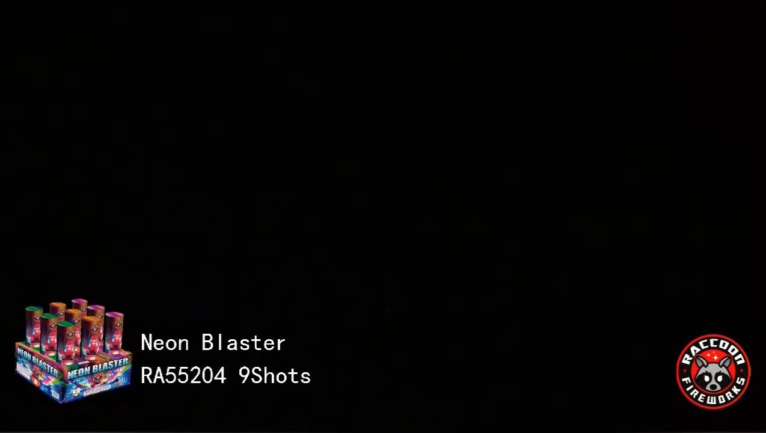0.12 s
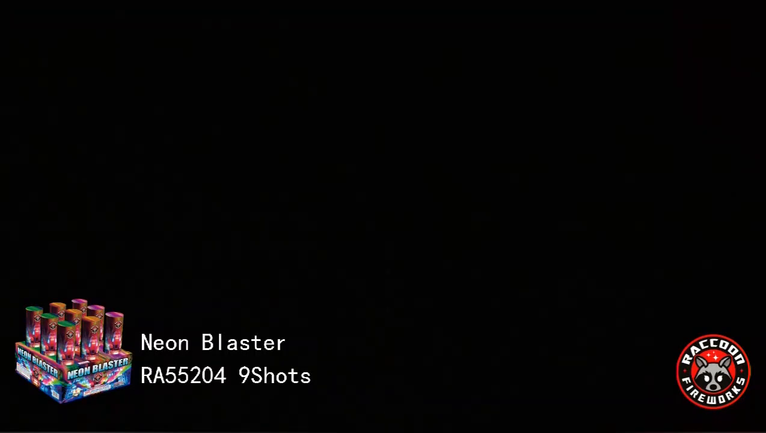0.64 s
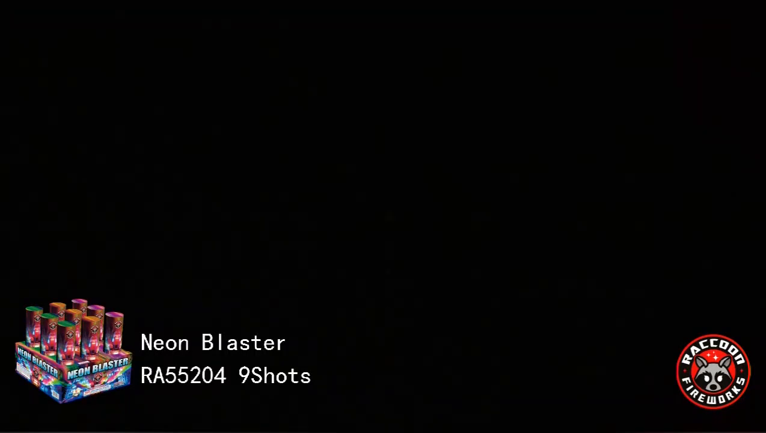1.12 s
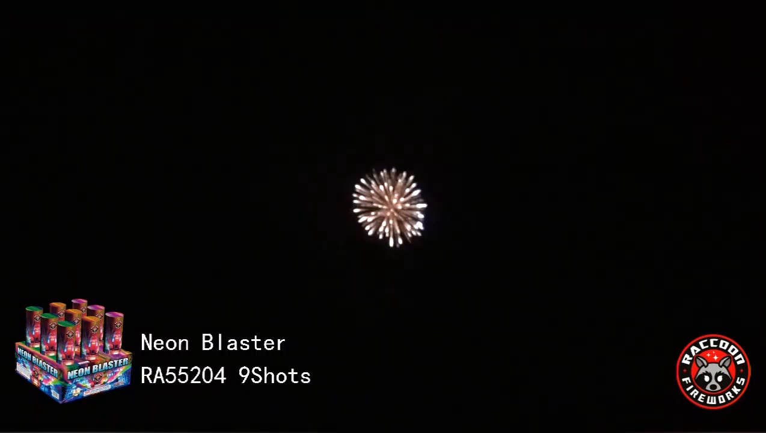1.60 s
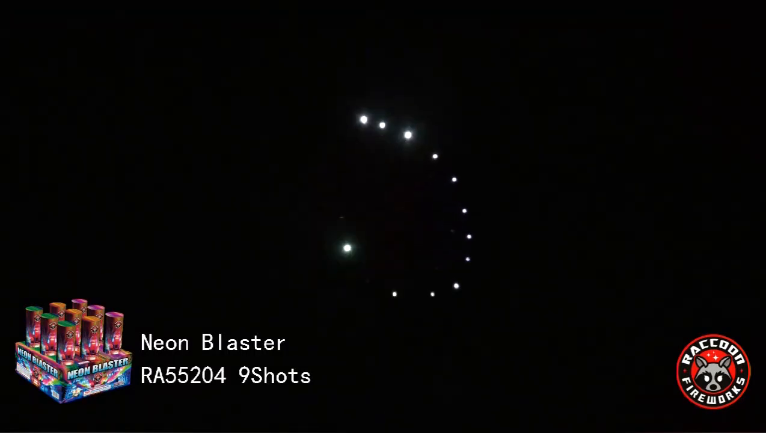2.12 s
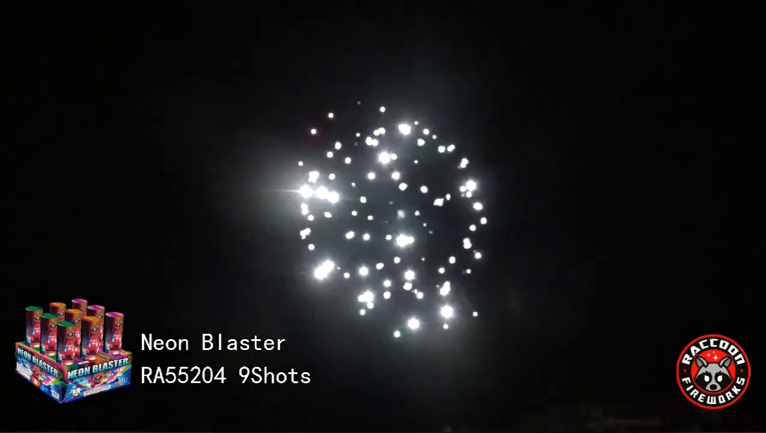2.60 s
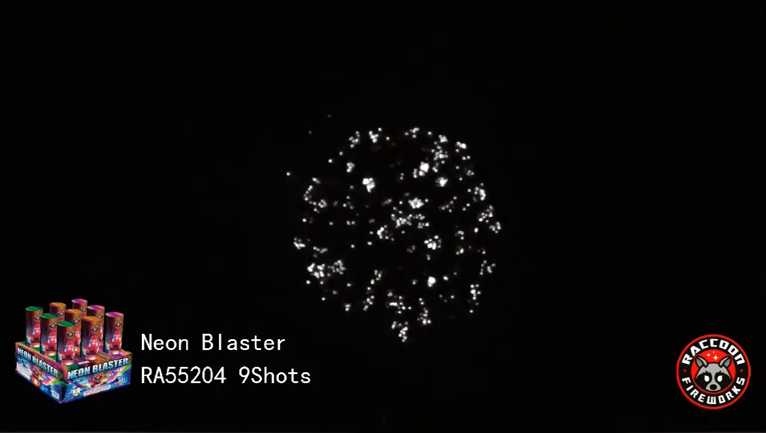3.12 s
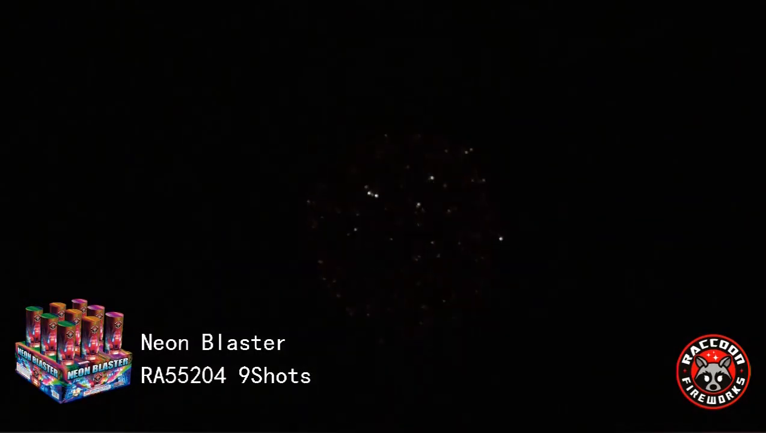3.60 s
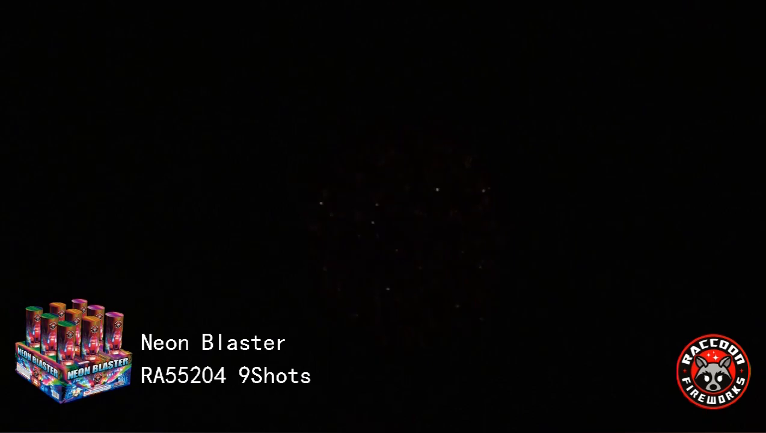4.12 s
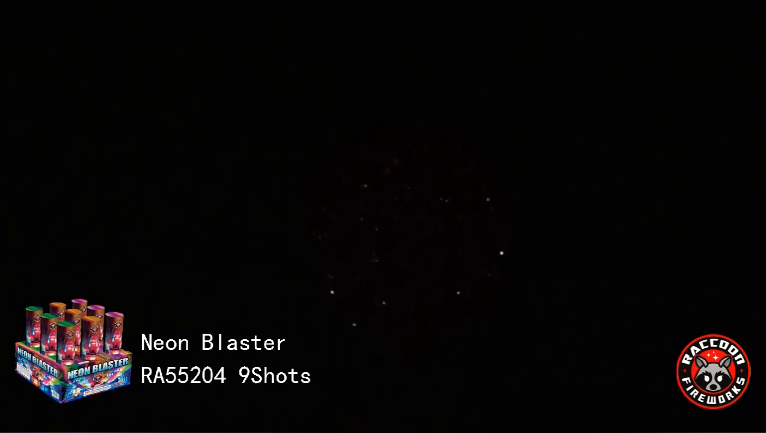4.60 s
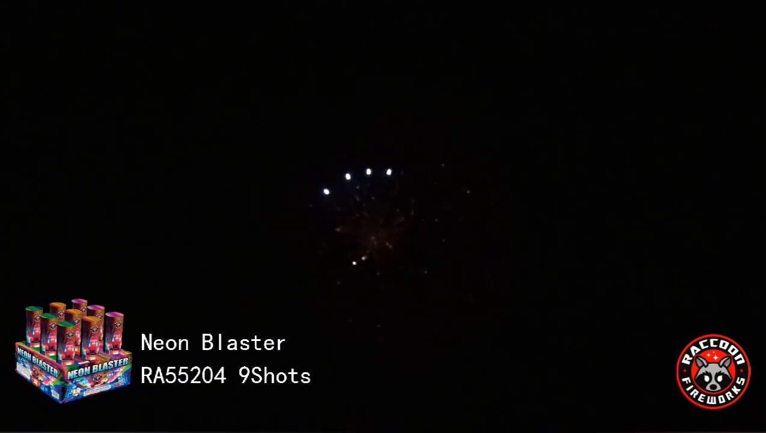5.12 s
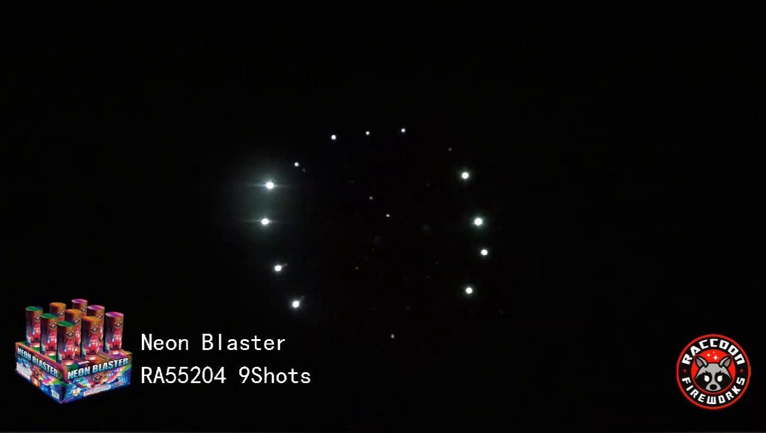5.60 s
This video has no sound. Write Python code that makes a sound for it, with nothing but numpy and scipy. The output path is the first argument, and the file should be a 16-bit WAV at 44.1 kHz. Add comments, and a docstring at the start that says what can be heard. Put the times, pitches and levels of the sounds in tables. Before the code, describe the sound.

Outdoor night fireworks heard from about a hundred metres. A fading launch echo opens over high insect buzz and faint rumble. A shell bursts with a cracking boom that rolls back from trees and slopes, then a dense crackle of stars erupts, a launch thumps within it, and a second shell booms near the end. Stereo microphones, with loud peaks slightly rounded.

```python
"""Firework shells at night, a hundred metres off, with insects buzzing and a far rumble all through.
It opens on the tail of a launch just before the start; a first shell bursts near 1.9 s.
A cloud of stars crackles from about 2.9 s, a second launch thumps at 3.2 s, and a second shell bursts near 5.3 s.
The fronts and stars are short pressure pulses; the blasts roll back from trees and slopes as dense noise
echoes, whose colour changes with delay; the insects are coloured noise, the buzzers pulsed by wing strokes."""
import sys
import numpy as np
from scipy import signal
from scipy.fft import rfft, irfft, next_fast_len
from scipy.io import wavfile
from scipy.ndimage import uniform_filter1d, map_coordinates

SR = 44100
rng = np.random.default_rng(int(sys.argv[2]) if len(sys.argv) > 2 else 0)


def gain_from_db(level_db):
    """Convert decibel levels to linear amplitude factors (20 dB per decade)."""
    decades = np.asarray(level_db, float) / 20
    return 10 ** decades


def generate_wav(signal):
    """Clip the signal to [-1, 1] and save it as 16-bit WAV at the path in sys.argv[1]."""
    frames = np.transpose(np.atleast_2d(signal))
    scaled = np.clip(frames, -1, 1) * 32767
    pcm = np.round(scaled).astype(np.int16)
    wavfile.write(sys.argv[1], SR, pcm)


N = 252252
T = np.arange(N) / SR  # time of every sample [s]


def unit(x):
    """Scaled to rms 1."""
    return x / np.sqrt(np.mean(x ** 2) + 1e-20)


def along(points, hz):
    """Reads (frequency, value) points on a log frequency axis."""
    f, v = np.transpose(points)
    return np.interp(np.log(hz + 1), np.log(f + 1), v)


def curves(rows):
    """One value per sample for each column after the time."""
    s, *cols = np.transpose(rows)
    return [np.interp(T, s, c) for c in cols]


def wobble(rate):
    """A smooth random curve, rate knots a second."""
    return map_coordinates(rng.standard_normal(int(N * rate / SR) + 4), [T * rate])


def coloured(pair, spectrum, alike):
    """Two unrelated signals made into a stereo pair of rms 1 with this spectrum and left-right likeness."""
    m = next_fast_len(N + 8192)
    hz = np.fft.rfftfreq(m, 1 / SR)
    turn = np.arccos(np.clip(along(alike, hz), -1, 1)) / 2
    shaped = rfft(pair, m) * gain_from_db(along(spectrum, hz))
    mid, side = irfft(shaped * [np.cos(turn), np.sin(turn)], m)[:, :N]
    return unit(np.array([mid + side, mid - side]))


# copies of a pulse off the ground: (delay [ms], level [dB])
GROUND_COPIES = [(1.4, -8.5), (4, -9.5)]


def pops(s, db, hz, pan_db, damping, scatter, air_hz):
    """Pressure pulses, suck then push, with ground copies and a few ms of scattered sound; the air dulls them."""
    t = np.arange(SR // 50) / SR
    cycles = t * hz[:, None]
    wave = -np.exp(damping / 4) * 4 * cycles * np.exp(-damping * cycles) * np.sin(2 * np.pi * cycles)
    wave = wave + sum(gain_from_db(g) * np.roll(wave, round(d * SR / 1000), axis=1) for d, g in GROUND_COPIES)
    # scattered sound falls 60 dB in 19 ms
    wave = wave + scatter * rng.standard_normal((2, *wave.shape)) * gain_from_db(-60 * t / 0.019)
    at = (np.round(s * SR).astype(int)[:, None] + np.arange(len(t))).ravel()
    sides = gain_from_db(db + np.outer([.5, -.5], pan_db))[..., None] * wave
    air = signal.butter(3, air_hz, fs=SR, output="sos")
    return signal.sosfilt(air, [np.bincount(at, w.ravel(), N + SR)[:N] for w in sides])


# insects: (time [s], buzzer level [dB], lower chorus level [dB])
INSECT_LEVELS = [(0, -59.5, -68.5), (.7, -55.5, -70), (1.85, -56, -69), (2.5, -58, -66), (3.7, -58, -65),
                 (4.3, -57, -75), (5.2, -54.5, -72), (5.72, -57.5, -72)]
# colours of buzzers, chorus and far rumble: (frequency [Hz], relative density [dB per Hz])
BUZZ_COLOUR = [(3240, -47), (5500, -23), (6520, -24), (7290, -15), (8260, -9), (9490, -3.5), (10800, -4),
               (12000, -11), (12800, -17), (13600, -17), (15100, -25), (16000, -13)]
CHORUS_COLOUR = [(2600, -38), (3300, -8), (3550, -4), (3720, 4.5), (3900, -5.5), (4290, -3), (4650, 0),
                 (4890, -4.5), (5600, -17), (7280, -55)]
RUMBLE_COLOUR = [(15, -35), (30, 1.5), (60, 0.5), (120, -2.5), (237, -12.5), (371, -9), (500, -15),
                 (700, -16.5), (1140, -15.5), (2000, -21.5), (3300, -30), (4290, -35), (7260, -57)]
# width of the far rumble: (frequency [Hz], left-right likeness [0-1])
RUMBLE_ALIKE = [(60, 1), (300, 0.93), (2000, 1)]


def night():
    """Buzzers rasp their wings about 168 times a second; a lower chorus and far rumble lie beneath."""
    buzz_db, chorus_db = curves(INSECT_LEVELS)
    turn = 2 * np.pi * np.cumsum(168.5 + 1.5 * wobble(3)) / SR
    strokes = 1 + (.33 + .1 * wobble(4)) * np.cos(turn) + .15 * np.cos(2 * turn)
    noise = rng.standard_normal((3, 2, N))
    # the left channel has slightly more buzz and rumble
    buzz_gain = gain_from_db(buzz_db + 0.2 * wobble(9.4) + [[.4], [-.4]])
    buzz = buzz_gain * coloured(noise[0] * strokes, BUZZ_COLOUR, [(8000, 0.082), (13000, 0.82)])
    chorus_gain = gain_from_db(chorus_db + 2.3 * wobble(55))
    chorus = chorus_gain * coloured(noise[1], CHORUS_COLOUR, [(3000, 1.0), (5000, 0.87)])
    rumble_gain = gain_from_db(-63.5 + 1.5 * wobble(3.8) + [[.7], [-.7]])
    return buzz + chorus + rumble_gain * coloured(noise[2], RUMBLE_COLOUR, RUMBLE_ALIKE)


# loudest crackling stars and ticks: (time [s], level [dB], pitch [Hz], pan, left over right [dB])
LOUD_STARS = [(.533, -37, 2400, -3), (2.9199, -26, 2400, -1), (2.97, -20.5, 2900, 1),
              (3.041, -23, 2500, -.5), (3.059, -28, 1480, -15.5), (3.092, -19.5, 1900, 9),
              (3.1, -19.5, 2500, 12), (3.131, -15.5, 3000, 1), (3.1537, -19, 2520, 4),
              (3.1774, -9, 2170, -1), (3.1805, -13, 2710, -4), (3.1814, -8.5, 3500, -2),
              (3.2075, -16, 2400, -2), (3.2132, -13, 4200, -2), (3.2227, -8.5, 2140, 4),
              (3.2258, -9.5, 1980, 1), (3.2288, -16, 4500, -6), (3.259, -23, 4000, 5),
              (3.298, -25, 3000, -8), (3.333, -19.5, 2500, -10), (3.374, -20.5, 2520, -4),
              (3.4206, -20.5, 2800, -2), (3.4487, -14.5, 5530, 0), (3.5122, -20.5, 2310, -4),
              (3.6143, -22.5, 2080, -.5), (5.655, -27, 1700, -9), (5.705, -30, 1700, -13)]
# the rest of the crackle: (time [s], rate [pops a second], level of the smallest pops [dB])
STAR_CLOUD = [(2.85, 20, -45), (3.05, 150, -38), (3.2, 350, -35), (3.35, 200, -36), (3.55, 50, -44),
              (3.75, 10, -48)]


def crackle(count=600):
    """Small stars snap: a few loud ones over a random cloud, thinned from count candidates."""
    s, db, hz, pan_db = np.transpose(LOUD_STARS)
    times, rate, size_db = np.transpose(STAR_CLOUD)
    span = times[-1] - times[0]
    draw = rng.random((count, 5))
    when = times[0] + span * draw[:, 0]
    fires = draw[:, 1] * count / span < np.interp(when, times, rate)
    draw, when = draw[fires], when[fires]
    size = np.interp(when, times, size_db) + 12 * draw[:, 2] ** 2  # mostly small, some up to 12 dB louder
    pitch, cloud_pan_db = 1200 + 2200 * draw[:, 3], 5 * (draw[:, 4] - .5)
    loud = pops(s, db, hz, pan_db, damping=3.8, scatter=0.13, air_hz=6800)
    return loud + pops(when, size, pitch, cloud_pan_db, damping=6.9, scatter=0.26, air_hz=4500)


def patchy(pair, depth_db):
    """Echo paths interfere: narrow bands swell and fade at random."""
    z = signal.stft(pair, nperseg=1024)[2]
    field = uniform_filter1d(rng.standard_normal(z.shape[1:]), size=3, axis=0)
    field = uniform_filter1d(field, size=7, axis=1)
    return signal.istft(z * gain_from_db(depth_db * unit(field)), nperseg=1024)[1][:, :N]


# pipe modes of the launch tube: (frequency [Hz], width [Hz], level [dB])
TUBE_MODES = [(194, 165, 0), (673, 27, 11.5), (860, 51, 3), (1170, 28, 3), (1396, 61, 4), (1580, 44, 1),
              (2110, 150, 4), (2740, 400, 2)]


def tube(x):
    """The modes of a pipe closed at one end, over a weak even share."""
    f = np.fft.rfftfreq(N, 1 / SR)
    power = sum(gain_from_db(db) ** 2 / (1 + ((f - hz) / width * 2) ** 2) for hz, width, db in TUBE_MODES)
    return irfft(rfft(x) * np.sqrt(power + .2), N)


def after(blasts, rows):
    """For each blast, the delay since it and the levels of rows then, shifted by its strength and fading."""
    delay, *cols = np.transpose(rows)
    echoes = []
    for s, strength_db, fading in blasts:
        since = T - s
        shift_db = strength_db - fading * since
        echoes.append((since, *[shift_db + np.interp(since, delay, c, left=-120, right=-120) for c in cols]))
    return echoes


def four_powers(delay, boom_db, middle_db, treble_db, treble_slope, top_db, top_slope):
    """Power of boom, middle, treble and top; the last two set against the middle, slopes in dB per s of delay."""
    late = np.maximum(delay, 0)
    treble = middle_db + treble_db + treble_slope * late
    top = middle_db + top_db + top_slope * late
    return gain_from_db([boom_db, middle_db, treble, top]) ** 2


# bursts in the sky: (time [s], strength [dB], extra fading [dB per s])
SKY_BURSTS = [(1.907, 0, 0), (5.253, 0.5, 0.5)]
# what trees and slopes return, with a short noisy lead-in of about 30 ms:
# (delay [s], boom level [dB], middle level [dB])
BURST_ECHOES = [(-.033, -77, -90), (-.023, -42, -45), (-.012, -45.5, -43), (-.008, -26.5, -34.5),
                (-.001, -20.5, -35.5), (.002, -24.5, -25.5), (0.013, -19.5, -35.5), (.065, -18.5, -29.5),
                (.15, -19.5, -31.5), (.2, -25, -33.5), (.36, -29, -39), (.43, -30, -37.5),
                (0.499, -24.5, -36), (.59, -36.5, -44.5), (.68, -43.5, -51), (.8, -39, -50.5),
                (.88, -43, -45), (0.89, -32, -39.5), (.92, -33, -42.5), (1.0, -41.5, -50), (1.8, -57, -84)]


def burst_powers():
    """Echo power of the bursts; treble and top sink against the middle as the delay grows."""
    colour = dict(treble_db=-4.5, treble_slope=-0.7, top_db=-11, top_slope=-4.5)
    return sum(four_powers(*row, **colour) for row in after(SKY_BURSTS, BURST_ECHOES))


# launches from the rack, the first just before the start: (time [s], strength [dB], extra fading [dB per s])
RACK_LAUNCHES = [(-.32, -0.43, .4), (3.235, -0.55, -0.29)]
# what comes back after a launch: (delay [s], boom level [dB], middle level [dB])
LAUNCH_ECHOES = [(-.003, -70, -37), (.004, -37.5, -36), (.04, -23.5, -38), (.11, -26, -35.5),
                 (.14, -31, -39.5), (.2, -40, -51), (.32, -43.5, -51), (.55, -52.5, -57.5),
                 (.7, -58.5, -58), (.8, -59.5, -65.5), (.87, -55.5, -56.5), (.97, -50, -54),
                 (1.07, -50.5, -59), (1.16, -59, -61.5), (1.31, -54.5, -59.5), (1.4, -61.5, -61),
                 (1.5, -64, -67), (2.1, -77, -74.5)]
# late echoes of a launch carry the ring of its tube: (delay [s], share [0-1])
RINGING_SHARE = [(.3, 0.18), (.75, 0.44), (.88, 1), (1.45, 0.4), (1.9, 0.35)]


def launch_powers():
    """Echo power of the launches, tossed to and fro by near walls, and the share that rings like the tube."""
    flutter_s, flutter_db, flutter_dies_s = 0.0338, 6, 0.094
    # the treble sinks against the middle with delay, the top gains on it
    colour = dict(treble_db=0, treble_slope=-7, top_db=-14.5, top_slope=6)
    power, share = 0, np.zeros(N)
    for d, boom_db, middle_db in after(RACK_LAUNCHES, LAUNCH_ECHOES):
        flutter = flutter_db * np.cos(2 * np.pi * d / flutter_s) * np.exp(-np.abs(d) / flutter_dies_s)
        power = power + four_powers(d, boom_db + flutter, middle_db + flutter, **colour)
        share = share + np.interp(d, *np.transpose(RINGING_SHARE), left=0, right=0)
    return power, np.clip(share, 0, 1)


# echoes of the crackling cloud: (time [s], middle level [dB])
CLOUD_WASH = [(2.5, -100), (2.8, -73), (3.0, -48), (3.11, -37.5), (3.21, -36), (3.35, -41), (3.45, -43.5),
              (3.68, -57.5), (3.87, -57.5), (4.05, -69), (4.4, -100)]
# the other parts of that wash against its middle: (boom [dB], treble [dB], top [dB])
CLOUD_WASH_PARTS = (1.9, -4, -8)


def wash_powers():
    """Echo power of the crackling cloud, of one colour throughout."""
    boom, treble, top = CLOUD_WASH_PARTS
    parts_db = np.array([boom, 0, treble, top])[:, None]
    return gain_from_db(curves(CLOUD_WASH)[0] + parts_db) ** 2


def rasp_gain():
    """A bright rasp: a brief noise ramp leads into each burst, launches start at once; both die away."""
    gain = 0
    for s, db, _ in SKY_BURSTS:
        sixty_db_s = np.where(T > s, 1, 0.054)
        gain = gain + gain_from_db(db - 44 - 60 * np.abs(T - s) / sixty_db_s)
    for s, db, _ in RACK_LAUNCHES:
        gain = gain + gain_from_db(db - 57 - 60 * np.abs(T - s) / .7) * (T > s)
    return gain


def flanks(plain):
    """The first echoes of a burst come from both flanks: a copy 3 ms late, opposite in the two channels."""
    gain = sum(gain_from_db(-8) * np.exp(-np.abs(T - s) / 0.026) for s, *_ in SKY_BURSTS)
    return gain * np.roll(plain.mean(axis=0), round(.003 * SR)) * [[1], [-1]]


# colours of the echo parts and the rasp: (frequency [Hz], relative density [dB per Hz])
BOOM_COLOUR = [(25, -6), (59, -23.5), (99, -10.5), (161, -3.5), (220, -0.5), (287, -1), (350, -4.5),
               (456, -5), (540, -12.5), (730, -58), (1230, -120)]
MIDDLE_COLOUR = [(300, -48), (500, -22), (600, 3.5), (680, -1), (770, 1), (860, 1), (1000, -2.5),
                 (1300, -9.5), (1500, -11.5), (1900, -40), (3190, -120)]
TREBLE_COLOUR = [(800, -35), (1350, -6.5), (1800, -0.5), (2100, -4), (2800, -5.5), (3500, -14.5),
                 (4200, -23), (6000, -43), (9000, -120)]
TOP_COLOUR = [(2200, -34), (3500, -4.5), (4200, -4), (5800, -6), (7500, -12.5), (9000, -17.5),
              (12000, -50.5)]
RASP_COLOUR = [(4410, -23), (7500, -3), (9160, -7.5), (11800, 1.5), (13300, -1.5), (15300, -6),
               (16000, -17.5)]
# width of the echoes: (frequency [Hz], left-right likeness [0-1])
ECHO_ALIKE = [(40, 0.99), (100, 0.92), (220, 0.99), (400, 0.97), (700, 0.97), (1300, 0.98), (2400, 0.97),
              (4200, 0.97), (5000, 0.32), (8000, 0.034), (11000, 0.34), (14000, 1)]


def roll():
    """Echoes of uneven size arrive densely; every part of the spectrum shares their clumps."""
    launch_power, ringing = launch_powers()
    powers = burst_powers() + launch_power + wash_powers()
    echoes = patchy(rng.standard_normal((2, N)), depth_db=1.77)
    echoes = echoes * gain_from_db(0.86 * wobble(60) + 0.86 * wobble(250))
    colours = (BOOM_COLOUR, MIDDLE_COLOUR, TREBLE_COLOUR, TOP_COLOUR)
    plain = sum(np.sqrt(p) * coloured(echoes, colour, ECHO_ALIKE) for p, colour in zip(powers, colours))
    plain = plain + flanks(plain)
    rasp = rasp_gain() * coloured(echoes, RASP_COLOUR, ECHO_ALIKE)
    return (1 - ringing) * plain + ringing * tube(plain) + rasp


# fronts of bursts, launch and sharp echoes: (time [s], thud level [dB], thud pitch [Hz], crack level [dB])
SHOCK_FRONTS = [(1.9085, -11, 446, -18), (1.932, -14.5, 720, -18.5), (1.943, -21, 700, -17.5),
                (1.9675, -15.5, 705, -17.5), (1.971, -18.5, 900, -10.5), (2.42, -15, 320, -40),
                (2.7925, -19.5, 755, -33), (3.2326, -10.5, 730, -27), (3.2378, -10, 870, -11.5),
                (3.2392, -9.5, 202, -35), (3.265, -13, 364, -52), (3.301, -12.5, 835, -24),
                (3.305, -74, 500, -21), (3.349, -20, 463, -23), (5.253, -12, 460, -25.5),
                (5.276, -13, 740, -24), (5.31, -13, 704, -15), (5.516, -12, 358, -35)]


def shocks():
    """The fronts that stand out of the roll: a thud and a steep crack together, each a little off centre."""
    s, db, hz, crack_db = np.transpose(SHOCK_FRONTS)
    pan_db = 2.8 * rng.standard_normal((len(s), 2))
    thuds = pops(s, db, hz, pan_db[:, 0], damping=2.9, scatter=.05, air_hz=5000)
    thuds = signal.sosfilt(signal.butter(2, 110, "high", fs=SR, output="sos"), thuds)
    crack_hz = np.full(len(s), 3000.0)
    return thuds + pops(s, crack_db, crack_hz, pan_db[:, 1], damping=2.8, scatter=0.1, air_hz=9000)


def scene():
    """Everything in the air at the microphones."""
    return roll() + shocks() + crackle() + night()


def band_limit(x):
    """A steep low-pass at the top of the band."""
    return signal.sosfilt(signal.butter(12, 16500, fs=SR, output="sos"), x)


def record(dry):
    """The microphones lose the deepest bass and round off the tallest peaks; then the band is limited."""
    x = signal.sosfilt(signal.butter(3, 65, "high", fs=SR, output="sos"), dry)
    x = x / (1 + np.abs(x / .38) ** 4) ** (1 / 4)  # peaks stay below 0.38
    mix = irfft(rfft(x) * (np.fft.rfftfreq(N, 1 / SR) < 15800), N)
    return band_limit(mix)


dry = scene()
out = record(dry)
generate_wav(out)
```